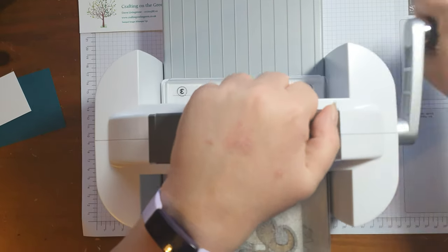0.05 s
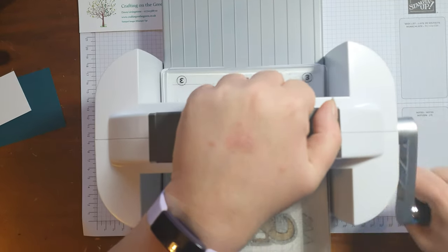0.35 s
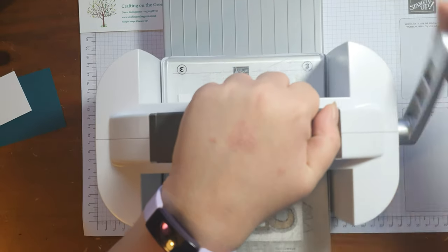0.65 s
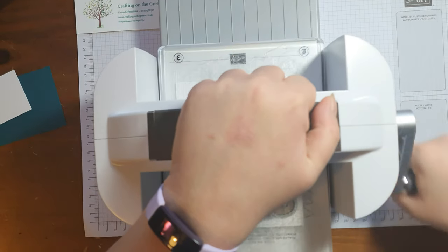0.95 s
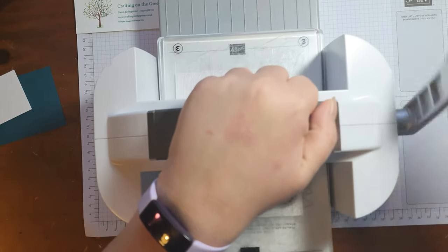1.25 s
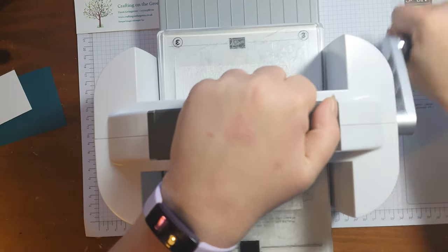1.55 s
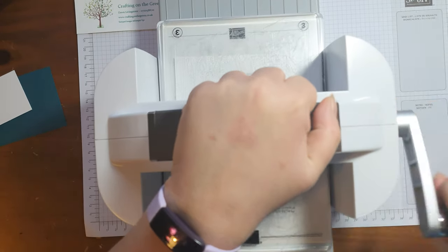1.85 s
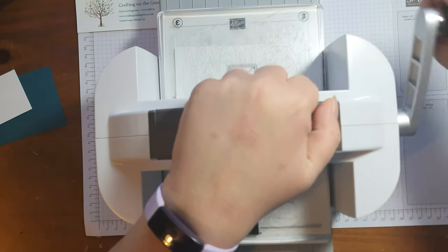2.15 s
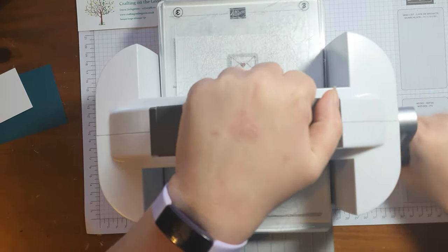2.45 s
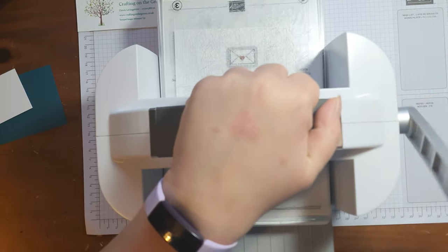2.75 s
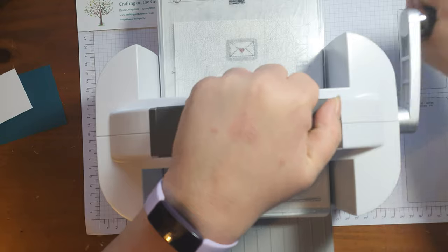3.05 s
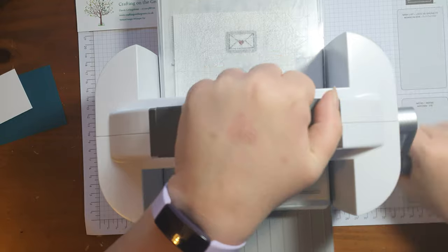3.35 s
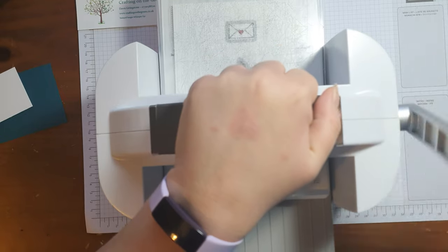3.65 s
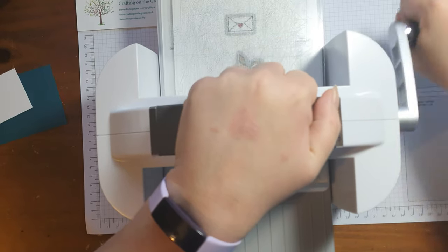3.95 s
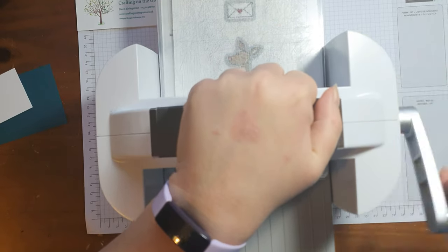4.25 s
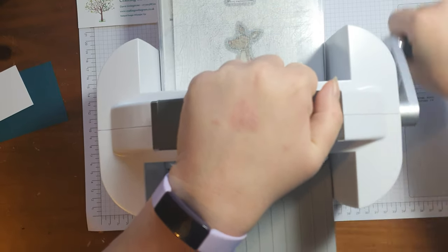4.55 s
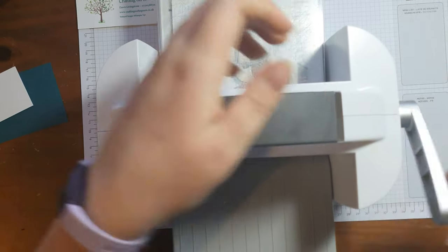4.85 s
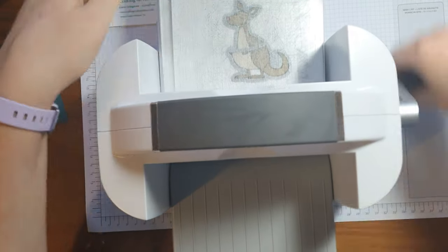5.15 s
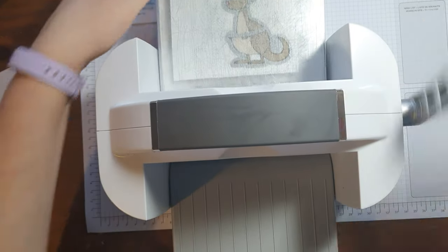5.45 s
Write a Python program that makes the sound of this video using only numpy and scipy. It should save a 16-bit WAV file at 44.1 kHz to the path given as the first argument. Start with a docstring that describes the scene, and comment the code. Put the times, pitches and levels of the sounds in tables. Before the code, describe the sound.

A hand-cranked die-cutting machine is heard close up on a craft table in a small room, in stereo with the treble leaning left. It opens with light plastic clicks and a bump as stacked plates are nudged in. At about 0.6 seconds the rollers grab them with a loud, sharp knock. A quiet low rumble and grinding run throughout, pulsing gently with each crank turn, scattered with faint ticks and dull creaks. From 1.5 seconds a hollow groan swells, ending in a click and thump near 1.9. The rollers carry on softly until the top plate snaps at 3.9 seconds and the stack comes free with a second loud knock at 4.1. A few small clicks follow. From about 4.4 seconds to the end, near 5.6, the unloaded crank rattles in its gears over a stronger rumble, with soft thumps and plate clicks around 5.4.

```python
"""Light clicks and a bump as a stack of plastic plates is nudged into a hand-cranked die-cutting machine.
The rollers grab it with a knock, then rumble, grind and tick while the strained plates creak and groan.
The top plate snaps, the stack knocks free, and the unloaded crank rattles in its gears.
Heard close to the craft table in a small room, on a stereo pair with the treble leaning left."""
import sys
import numpy as np
from scipy import signal
from scipy.io import wavfile

SR = 44100
rng = np.random.default_rng(int(sys.argv[2]) if len(sys.argv) > 2 else 0)


def waveform_to_disk(signal):
    """Save audio, clipped to [-1, 1], as 16-bit WAV at the path in sys.argv[1]."""
    frames = np.transpose(np.atleast_2d(signal))
    scaled = np.clip(frames, -1, 1) * 32767
    samples = np.round(scaled).astype(np.int16)
    wavfile.write(sys.argv[1], SR, samples)


N = 246501
TIME = np.arange(N) / SR
BANDS_HZ = 28 * 2 ** (np.arange(28) / 3)
STEP = 8   # samples per point of a power envelope

# decay of the small room: (frequency [Hz], t60 [s])
ROOM_T60 = [(50, 1), (110, 0.09), (260, 0.52), (700, 0.2168), (1800, 0.27), (5000, 0.1924), (13000, 0.27)]
# how alike the two microphones sound: (frequency [Hz], likeness [0-1])
MIC_LIKENESS = [(60, 0.83), (160, 0.97), (260, 0.67), (550, 0.43), (1100, 0.3), (2200, 0.023),
                (9000, 0.056)]
# balance of the pair: (frequency [Hz], left minus right [dB])
MIC_BALANCE = [(100, 0.2), (280, -0.2), (550, 0), (1100, 1), (2400, 2), (4500, 0.5), (9000, 5.5)]
# echoes off the table and the housing: (left delay [s], right delay [s], level [dB])
ECHOES = [(.0043, 0.0039, -13), (.0079, 0.013, -15), (0.0167, 0.011, -13)]

# effort on the crank: (time [s], level [dB])
EFFORT = [(0, -1), (.2, 5), (1.0, 1.5), (1.42, -5), (1.78, 3.5), (2.15, 0.5), (2.6, 0), (3.3, 2.5),
          (3.55, 0.5), (3.85, 3.5), (4.35, 0.5), (4.7, 5), (5.59, 9.5)]
# roller rumble, roller grind, stack rubbing on the bed: (frequency [Hz], third-octave level [dB])
RUMBLE_SPECTRUM = [(28, -11.5), (40, 3), (57, 1.5), (80, 1), (105, 5), (160, -8.5), (220, -7.5), (400, -27),
                   (1000, -46)]
GRIND_SPECTRUM = [(100, -13.5), (220, -6.5), (400, 3), (520, -2), (720, 4), (900, -2), (1300, -2),
                  (1800, -11.5), (2400, -21.5), (5000, -28), (16000, -47.5)]
RUB_SPECTRUM = [(1000, -18.5), (2500, -6.5), (4500, -5.5), (7300, 2), (9200, -14.5), (15000, -15)]

# the machine rocks on the table: (time [s], level [dB], contact time [s])
THUMPS = [(0.062, -54, 0.0087), (0.125, -45.5, 0.02), (1.683, -56.5, .01), (1.875, -47.5, 0.0077),
          (3.3, -60.5, 0.038), (4.067, -48, .013), (4.696, -53, 0.015), (5.12, -48, 0.012),
          (5.392, -46.5, 0.016), (5.454, -48, 0.0034)]
# dull creaks of the plates under pressure: (time [s], level [dB], contact time [s])
CREAKS = [(0.432, -54.5, .006), (0.601, -57, 0.02), (0.838, -66.5, 0.018), (0.939, -63, 0.0045),
          (1.003, -74, 0.0047), (1.565, -72.5, 0.01), (1.68, -76, 0.017), (1.774, -71, 0.0044),
          (2.091, -70, 0.025), (2.195, -75, 0.024), (2.299, -71.5, 0.028), (2.489, -69.5, 0.012),
          (2.66, -75.5, 0.025), (3.335, -63, 0.0036), (5.528, -61.5, 0.013)]
# plate edges scrape and click against the bed and each other:
# (time [s], level [dB], contact time [s], brightness [dB/octave], hollow pitch [Hz])
CLICKS = [(0.058, -58.5, 0.016, -1.5, 3010), (0.101, -50.5, .025, 0, 400), (0.121, -43.5, .012, -1.5, 871),
          (0.135, -57, .012, 6.5, 2940), (0.262, -56, 0.027, 4.5, 780), (0.28, -56.5, .0045, 6.5, 3500),
          (0.6175, -39, .009, -0.5, 1300), (0.628, -43, .01, 2, 1300), (0.685, -49.5, .007, 3.5, 6950),
          (0.7435, -47, 0.0045, .5, 864), (0.755, -59, .004, 7.5, 2760), (0.866, -77, 0.0082, 3, 700),
          (1.24, -93, 0.042, 7, 6560), (1.464, -81, .004, -1.5, 3584), (1.875, -46, 0.0056, 2, 4750),
          (3.514, -94, .012, 10, 2946), (4.04, -74, .03, 7, 502), (4.065, -42, .013, 2.5, 6500),
          (4.077, -43, .015, -6, 1176), (4.214, -52.5, .009, 1.5, 5660), (4.222, -54, .012, 4, 4700),
          (5.3895, -46, 0.0048, -0.5, 3150), (5.408, -50, 0.02, 1.5, 412), (5.452, -50.5, 0.0046, -2, 1290),
          (5.565, -60.5, .004, 8, 3940)]
# the slack gears and crank rattle:
# (time [s], level [dB], contact time [s], brightness [dB/octave], hollow pitch [Hz])
RATTLES = [(4.449, -57, 0.026, -4, 1750), (4.505, -52.5, 0.0092, 1, 3500),
           (4.581, -44.5, 0.0091, -2.5, 4000), (4.696, -45.5, 0.041, -3.5, 2340),
           (4.733, -42.5, 0.017, -2, 2220), (4.755, -58, 0.0046, 5.5, 2840), (4.861, -50.5, 0.025, -3, 793),
           (4.875, -50, 0.0072, 6, 2730), (4.907, -48, .009, -3.5, 2340), (4.949, -64, 0.016, -3, 1700),
           (5.033, -47.5, 0.0029, 0.5, 2340), (5.1, -46, 0.009, 0, 706), (5.117, -48, 0.018, 2, 1160),
           (5.143, -53.5, 0.004, -2, 6800), (5.225, -53.5, 0.018, -1.5, 2500), (5.278, -58, 0.019, 1, 2640),
           (5.352, -67.5, 0.014, 4, 3300)]
# the top plate flexes and springs back: (time [s], level [dB], contact time [s], brightness [dB/octave])
SNAPS = [(1.876, -54.5, 0.0027, 2.5), (3.8997, -42, 0.0021, 2), (5.39, -54, 0.0025, .5)]
# the stack jumps into and out of the rollers:
# (time [s], level [dB], contact time [s], brightness [dB/octave])
KNOCKS = [(0.6375, -26, .0088, 0.37), (4.088, -27.5, 0.0073, 0.2)]

# how each kind of contact drives what it strikes: (frequency [Hz], level [dB])
HEAVY_PUSH = [(50, -1), (100, 0.5), (200, -9), (500, -7), (2000, -68)]
SOFT_PUSH = [(90, -5), (200, -4.5), (480, -3), (750, 3.5), (1600, -0.5), (2500, -23.5), (6000, -37.5),
             (12000, -48)]
EDGE_PUSH = [(90, -17), (200, -7.5), (480, -8.5), (750, -3), (1700, -1), (2500, -2.5), (4300, -5.5),
             (6800, -12.5), (14000, -26)]
LOOSE_PUSH = [(90, -14), (200, -10.5), (480, -5.5), (750, -2.5), (1700, -0.5), (2500, -10), (4300, -8.5),
              (6800, -16.5), (10600, -34), (14000, -43)]
HARD_PUSH = [(90, -15.5), (200, -6), (480, -4.5), (750, -3), (1000, 1), (1700, 1), (2500, -2), (4300, -5.5),
             (6800, -15), (14000, -24.5)]
# dense ringing of the plates and of the gear housing: (frequency [Hz], third-octave level [dB])
PLATE_SPECTRUM = [(28, -12), (55, 0), (90, -2), (150, -5.5), (260, -3), (560, -0.5), (1100, -0.5),
                  (1800, -0.5), (2300, -2), (3600, -2), (4500, -3.5), (5700, -3), (7200, 0.5), (9000, -4.5),
                  (14300, -2.5)]
HOUSING_SPECTRUM = [(28, -35), (80, -2), (150, -1), (400, -0.5), (720, -3), (1130, 2), (1800, -6.5),
                    (2300, -1), (3600, -1), (4500, -7.5), (5700, -3.5), (7200, 4), (9000, -8), (11400, 2),
                    (14300, -9)]
# modes of the top plate and of the gear housing: (frequency [Hz], level [dB], t60 [s])
PLATE_MODES = [(1120, 7.5, 0.069), (1268, 21, 0.032), (1940, -26.5, 0.47), (2400, -10.5, .25),
               (3680, 13, 0.013), (3900, 1, 0.11), (4030, -2, 0.19)]
GEAR_MODES = [(330, -31, 0.31), (609, -2.5, 0.23), (745, -6, 0.23), (1066, -2.5, 0.087), (1243, 4.5, 0.11),
              (1510, -4, 0.039), (1700, 6, 0.1), (1817, 0, 0.16), (2000, -15, 0.066), (2840, 1.5, 0.059),
              (4030, -6, 0.11), (4260, -3.5, 0.087), (6720, 0.5, 0.081), (8360, 2, 0.1), (10600, 6, 0.11),
              (10800, 3, 0.09)]
# modes of the machine on the table, struck at either side:
# (frequency [Hz], entry level [dB], exit level [dB], t60 [s])
BED_MODES = [(53.8, -1, 6, .45), (119.3, -3.5, 4.5, .35), (219.1, 2, 11.5, 0.14), (367, 5, -3.5, 0.12),
             (455.8, 7, 4, 0.15), (565, -6.5, 4, 0.15), (675.5, -9.5, 2.5, 0.2), (855, -2, -15, 0.058),
             (999, 9, 8.5, 0.1), (1155, -6, 9.5, 0.087), (1538, -1.5, -11.5, 0.043), (1697, 0.5, 9.5, 0.14),
             (1763, -2, -1, 0.21), (2155, 2, -2.5, 0.095), (2410, 0.5, -4, 0.083), (2680, -2.5, -9.5, 0.18)]

TURN_S, FASTEST_S, SLOWEST_S = .778, .1, .51   # one crank turn; its first fastest and slowest moments
SCRAPE_S, SWELL_S = .018, .009   # contacts longer than SCRAPE_S are scrapes, which swell in


def from_db(db):
    """Decibels to gain."""
    return 10 ** (np.asarray(db) / 20)


def rms_one(x):
    """Scale to unit rms."""
    return x / np.sqrt(np.mean(x ** 2) + 1e-20)


def at_hz(points, hz):
    """Read a table on a log-frequency axis."""
    freqs, values = np.transpose(points)
    return np.interp(np.log(hz), np.log(freqs), values)


def lag(x, seconds):
    """One-pole smoothing that keeps the area."""
    pole = np.exp(-1 / (seconds * SR))
    return signal.lfilter([1 - pole], [1, -pole], x + 1e-24)


def add(track, at_s, sound):
    """Mix a sound in at the given time."""
    size = track.shape[-1]
    start = int(np.clip(at_s * SR, 0, size - 1))
    track[..., start:start + sound.shape[-1]] += sound[..., :size - start]


def flutter(per_s, depth_db):
    """A random gain of unit power that changes per_s times a second."""
    knots = np.clip(rng.standard_normal(N // 20), -2, 2)
    return rms_one(from_db(depth_db * np.interp(TIME * per_s, np.arange(len(knots)), knots)))


def mic_gains(hz):
    """Left and right gain: the treble favours the left microphone."""
    return from_db(at_hz(MIC_BALANCE, hz) * np.array([[.5], [-.5]]))


def mic_phases(hz):
    """Left and right phase of a tone: further apart where the microphones sound less alike."""
    angle = np.arccos(np.clip(at_hz(MIC_LIKENESS, hz), 0, 1))
    return np.multiply.outer([.5, -.5], angle)


def noise_bands():
    """Third-octave noises at the pair, alike in the bass and nearly unrelated in the treble."""
    white, bands = rng.standard_normal((2, 2, N)), []
    for k, hz in enumerate(BANDS_HZ):
        edges = hz * 2 ** (np.array([-1, 1]) / 6)
        mid, side = signal.sosfilt(signal.butter(3, edges, "band", fs=SR, output="sos"), white[k % 2])
        alike = np.clip(at_hz(MIC_LIKENESS, hz), 0, .995)
        pair = np.sqrt(1 + alike) * mid + np.sqrt(1 - alike) * side * [[1], [-1]]
        bands.append(rms_one(pair) * mic_gains(hz))
    return bands


def hiss(level_db=-90, edge_hz=8400, air_db=-91.5):
    """The noise floor: faint steady hiss with a step down in the top octave."""
    low, air = rng.standard_normal((2, 2, N))
    low = signal.sosfilt(signal.butter(12, edge_hz, fs=SR, output="sos"), low)
    return from_db(level_db) * rms_one(low) + from_db(air_db) * air


def reflected(direct, from_hz=1500):
    """Hard surfaces nearby throw the treble back at the microphones and comb it."""
    treble = signal.sosfilt(signal.butter(2, from_hz, "high", fs=SR, output="sos"), direct)
    out = direct.copy()
    for left_s, right_s, echo_db in ECHOES:
        add(out[0], left_s, from_db(echo_db) * treble[0])
        add(out[1], right_s, from_db(echo_db) * treble[1])
    return out


def each_turn(at_s, width_s):
    """A smooth bump of height 1 that comes back with every turn of the crank."""
    away_s = (TIME - at_s + TURN_S / 2) % TURN_S - TURN_S / 2
    return np.exp(-(away_s / width_s) ** 2)


def rollers(bands, rumble_db=-71.5, grind_db=-76.5, rub_db=-89, slips_per_s=55, slip_s=.0069):
    """The rollers rumble and grind in tiny slips, following effort and speed; the stack rubs the bed."""
    effort_db = np.interp(TIME, *np.transpose(EFFORT))
    rumble = from_db(rumble_db + .55 * effort_db)
    grind = from_db(grind_db + effort_db - 5 * each_turn(SLOWEST_S, width_s=.11))
    slips = lag((rng.random(N) < slips_per_s / SR) * SR / slips_per_s, slip_s)
    grind *= np.sqrt(.25 + .75 * lag(slips, .00099))   # three quarters of the power comes in slips
    rub = from_db(rub_db + 6 * each_turn(FASTEST_S, width_s=.09)) * flutter(per_s=40, depth_db=2.5)
    layers = [(rumble, RUMBLE_SPECTRUM), (grind, GRIND_SPECTRUM), (rub, RUB_SPECTRUM)]
    return sum(band * sum(level * from_db(at_hz(spectrum, hz)) for level, spectrum in layers)
               for band, hz in zip(bands, BANDS_HZ))


def ticks(per_s=23, level_db=-76.5, t60_s=.035, range_hz=(390, 1870), modes=16, spread_db=4, scatter_db=5):
    """The turning rollers tick at random, loudest near the end, ringing hollow resonances."""
    times = np.flatnonzero(rng.random(N) < per_s / SR) / SR
    t, out = TIME[:SR // 12], np.zeros((2, N))
    hz = np.geomspace(*range_hz, modes)[:, None]
    decay = (1 - np.exp(-t * hz / 2)) ** 2 * from_db(-60 * t / t60_s)
    for at_s, (size, weight, phase, side) in zip(times, rng.uniform(-1, 1, (len(times), 4, modes, 1))):
        tones = np.sin(2 * np.pi * hz * t + np.pi * phase + np.sign(side) * mic_phases(hz))
        rings = from_db(scatter_db * weight) * decay * tones
        force_db = np.interp(at_s, *np.transpose(EFFORT)) + spread_db * size[0, 0]
        add(out, at_s, from_db(force_db) * rings.sum(axis=1))
    return from_db(level_db) * rms_one(out)


def groan(start_s=1.5, end_s=1.87, end_db=-60, pitch_hz=760, width_hz=110, slips_per_s=120):
    """Under growing strain the plates stick and slip, ringing one hollow resonance until they give."""
    slips = (rng.random(N) < slips_per_s / SR) * rng.standard_normal(N)
    tone = signal.lfilter(*signal.iirpeak(pitch_hz, pitch_hz / width_hz, fs=SR), slips + 1e-18)
    swell = np.sqrt(np.interp(TIME, [start_s, end_s], [0, 1], right=0))
    return from_db(end_db) * swell * rms_one(lag(tone, 1 / (2 * np.pi * pitch_hz)))


def strength(hz, push, at_s, level_db, contact_s, bright_db=0, hollow_hz=None):
    """How hard a contact drives hz: brightness tilts the treble, the struck spot lifts its own pitch."""
    treble_octaves = max(np.log2(hz / 1100), 0)
    hollow_db = 5.5 * np.exp(-(np.log2(hz / hollow_hz) / .34) ** 2) if hollow_hz else 0
    return from_db(level_db + at_hz(push, hz) + bright_db * treble_octaves + hollow_db)


def clatter(hits, push, spectrum, level_db, room_db, grit_db):
    """Power per band of the dense ringing, every STEP samples: a gritty contact, then the room's decay."""
    span = .03 * SR / STEP   # a hit's level is its mean power over 30 ms
    t, powers = TIME[:SR // 8:STEP], []
    grit = flutter(per_s=700, depth_db=grit_db)[::STEP]
    for hz in BANDS_HZ:
        direct = np.zeros(len(grit))
        for hit in hits:
            at_s, _, contact_s = hit[:3]
            length_s = max(contact_s, .001) * (1200 / hz) ** .17   # highs are over sooner
            burst = np.exp(-np.minimum(t / length_s, 10) ** 2)
            if contact_s > SCRAPE_S:
                burst *= (1 - np.exp(-t / SWELL_S)) ** 2
            add(direct, at_s / STEP, burst / burst.sum() * span * strength(hz, push, *hit) ** 2)
        direct = lag(direct * grit / grit.mean(), (.0005 + .75 / hz) / STEP)   # lows build more slowly
        room = lag(direct, at_hz(ROOM_T60, hz) / np.log(1e6) / STEP)
        gain = from_db(level_db + at_hz(spectrum, hz))
        powers.append(gain ** 2 * (direct + from_db(room_db) ** 2 * room))
    return np.array(powers)


def ringing(hits, push, modes, level_db, rise_s, scatter_db=2):
    """Each contact rings every mode with a strength and phase of its own; loose parts blur the pitch."""
    blur = .007   # line width as a share of the frequency
    t, out = TIME[:SR // 3], np.zeros((2, N))
    swell = 1 - np.exp(-t / SWELL_S)
    for hz, mode_db, t60 in modes:
        wander = np.cumsum(rng.standard_normal(2 * len(t))) * np.sqrt(2 * np.pi * blur * hz / SR)
        tone = np.exp(1j * (2 * np.pi * hz * TIME[:len(wander)] + wander))
        decay = (1 - np.exp(-t / rise_s)) ** 2 * from_db(-60 * t / t60)
        for hit, (size, pick, side) in zip(hits, rng.uniform(-1, 1, (len(hits), 3))):
            at_s, _, contact_s = hit[:3]
            gain = strength(hz, push, *hit) * from_db(level_db + mode_db + scatter_db * size)
            stretch = tone[int(abs(pick) * len(t)):][:len(t)]
            ring = stretch * decay * (swell if contact_s > SCRAPE_S else 1)
            pair = mic_gains(hz) * np.exp(1j * np.sign(side) * mic_phases(hz)[:, None])
            add(out, at_s, (gain * pair * ring).real)
    return out


def hollow_rings(hits, push, level_db, t60_s=.079):
    """Each clack rings briefly at the hollow pitch of the spot that is struck."""
    return sum(ringing([hit], push, [(hit[4], 0, t60_s)], level_db, rise_s=.00046) for hit in hits)


def bed_rings(hits, push, level_db, rise_s, halfway_s=3):
    """The stack strikes the entry side first, the exit side later; each weights the modes its own way."""
    entry_modes = [(hz, db, t60) for hz, db, _, t60 in BED_MODES]
    exit_modes = [(hz, db, t60) for hz, _, db, t60 in BED_MODES]
    early = [hit for hit in hits if hit[0] < halfway_s]
    late = [hit for hit in hits if hit[0] >= halfway_s]
    return (ringing(early, push, entry_modes, level_db, rise_s)
            + ringing(late, push, exit_modes, level_db, rise_s))


def contacts(bands):
    """Up front, plates and machine knock and rattle: dense ringing plus the struck parts' clear modes."""
    power = (clatter(KNOCKS, HARD_PUSH, PLATE_SPECTRUM, level_db=-1.4, room_db=-5, grit_db=7.5)
             + clatter(CLICKS, EDGE_PUSH, PLATE_SPECTRUM, level_db=-2, room_db=0, grit_db=6.5)
             + clatter(SNAPS, HARD_PUSH, PLATE_SPECTRUM, level_db=-6, room_db=-1, grit_db=14)
             + clatter(CREAKS, SOFT_PUSH, PLATE_SPECTRUM, level_db=-1, room_db=-6, grit_db=5)
             + clatter(THUMPS, HEAVY_PUSH, PLATE_SPECTRUM, level_db=-1.5, room_db=-1.5, grit_db=-.5)
             + clatter(RATTLES, LOOSE_PUSH, HOUSING_SPECTRUM, level_db=-3, room_db=-1.5, grit_db=12))
    dense = sum(band * np.repeat(gain, STEP)[:N] for band, gain in zip(bands, np.sqrt(power)))
    bed = (bed_rings(KNOCKS, HARD_PUSH, level_db=5, rise_s=.0012)
           + bed_rings(CLICKS, EDGE_PUSH, level_db=-.5, rise_s=.0021)
           + bed_rings(CREAKS, SOFT_PUSH, level_db=-1.5, rise_s=.001))
    gears = ringing(RATTLES, LOOSE_PUSH, GEAR_MODES, level_db=8, rise_s=.00087, scatter_db=4)
    top_plate = ringing(SNAPS, HARD_PUSH, PLATE_MODES, level_db=6.5, rise_s=.00025)
    hollow = hollow_rings(RATTLES, LOOSE_PUSH, level_db=6) + hollow_rings(CLICKS, EDGE_PUSH, level_db=.5)
    return reflected(dense) + bed + gears + top_plate + hollow


def scene():
    """The machine at work on the craft table, over the quiet of the room."""
    bands = noise_bands()
    roller_bands = (np.roll(band, N // 2, axis=1) for band in bands)   # shifted until unrelated
    return contacts(bands) + rollers(roller_bands) + ticks() + groan() + hiss()


def record(dry, low_cut_hz=34, ceiling=.8, top_cut_hz=16000):
    """The deepest bass is cut, the loudest knocks are softly limited, and the top is cut steeply."""
    heard = signal.sosfilt(signal.butter(2, low_cut_hz, "high", fs=SR, output="sos"), dry)
    limited = heard / (1 + (heard / ceiling) ** 4) ** .25
    return signal.sosfilt(signal.ellip(10, .1, 70, top_cut_hz, fs=SR, output="sos"), limited)


dry = scene()
out = record(dry)
waveform_to_disk(out)
```